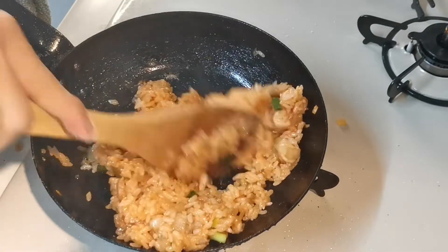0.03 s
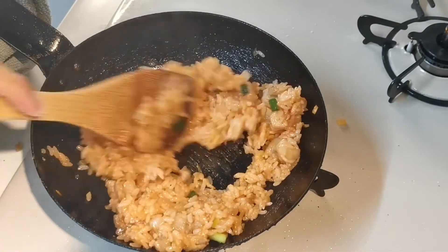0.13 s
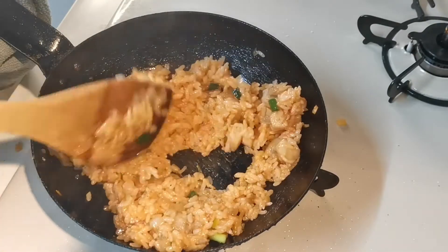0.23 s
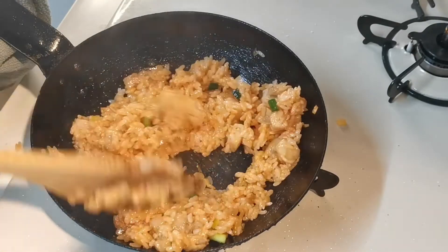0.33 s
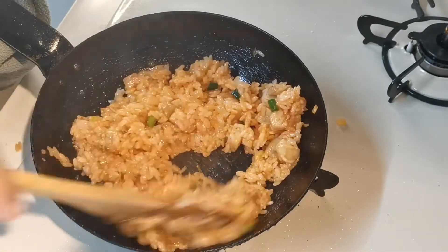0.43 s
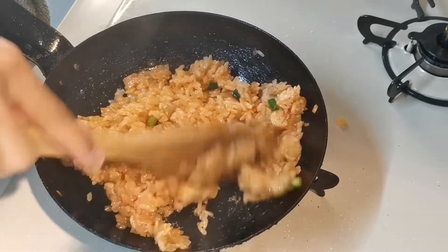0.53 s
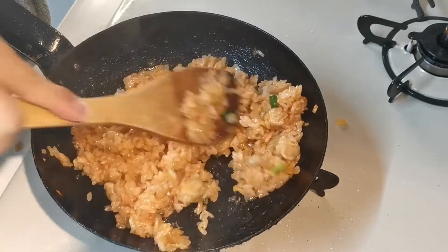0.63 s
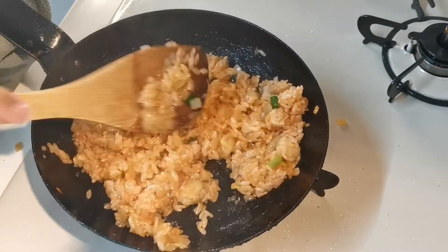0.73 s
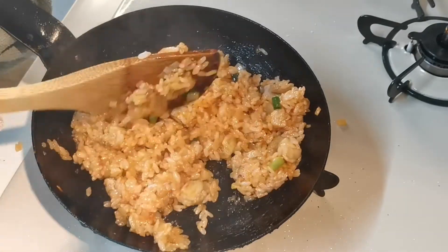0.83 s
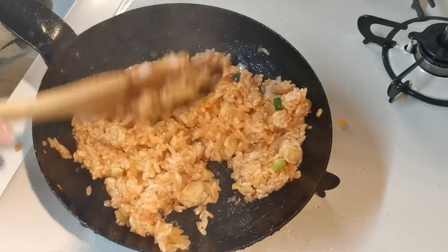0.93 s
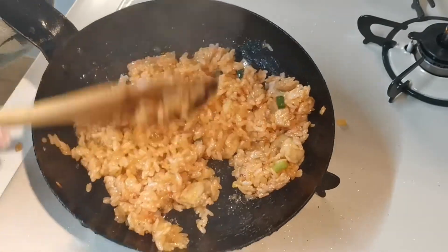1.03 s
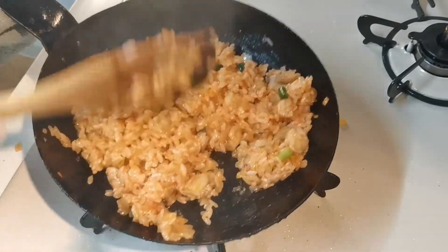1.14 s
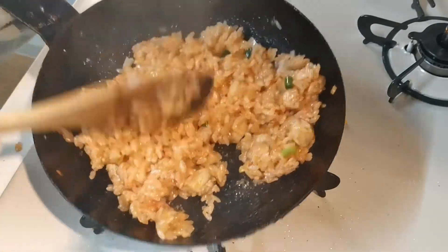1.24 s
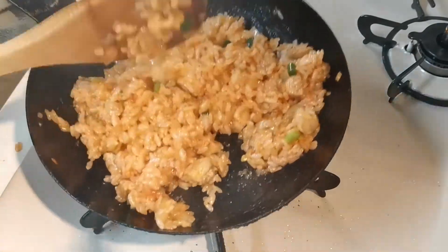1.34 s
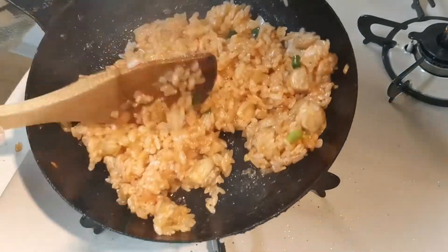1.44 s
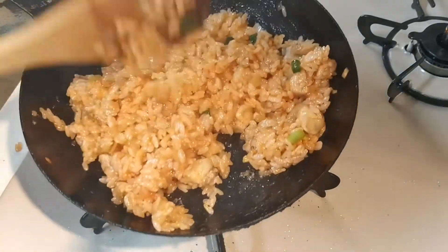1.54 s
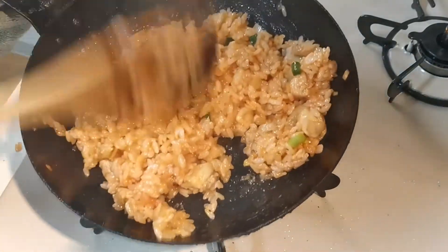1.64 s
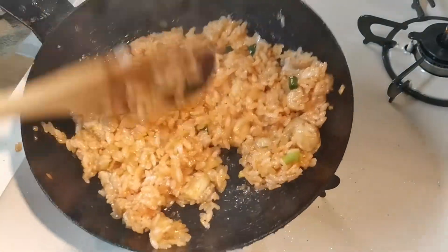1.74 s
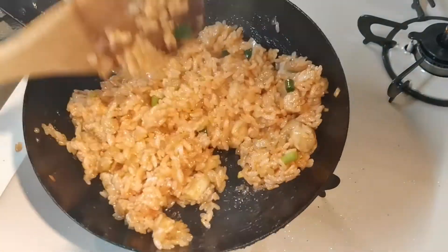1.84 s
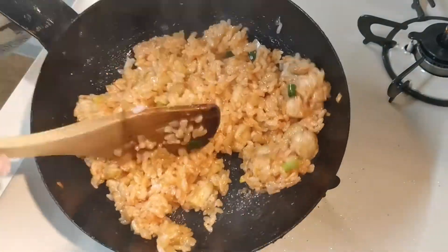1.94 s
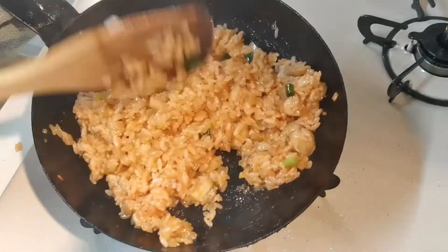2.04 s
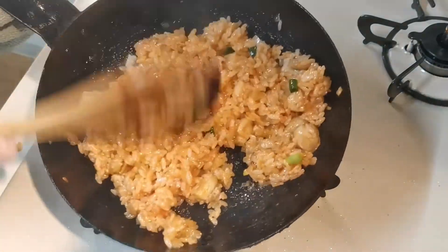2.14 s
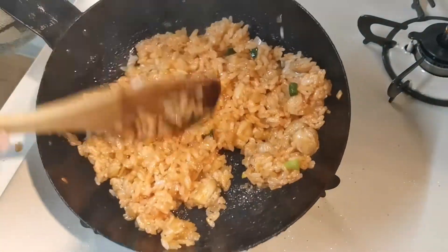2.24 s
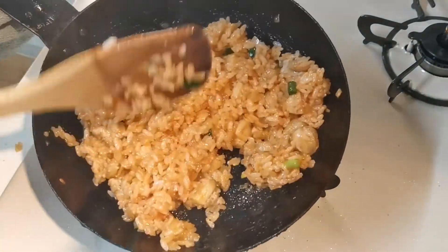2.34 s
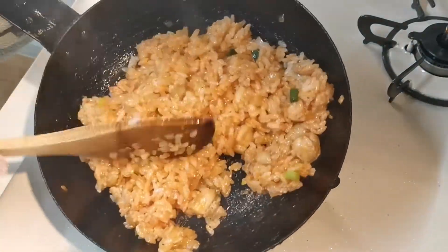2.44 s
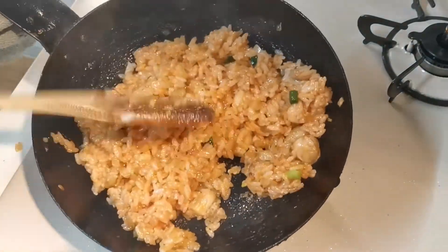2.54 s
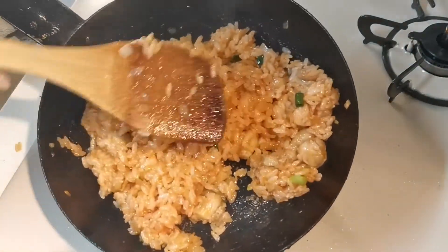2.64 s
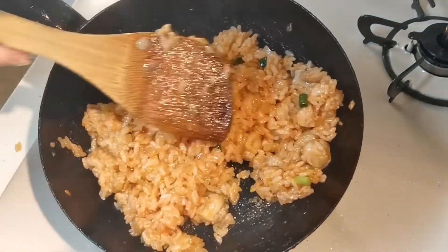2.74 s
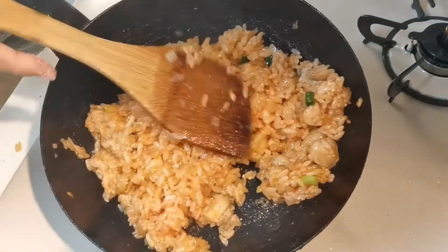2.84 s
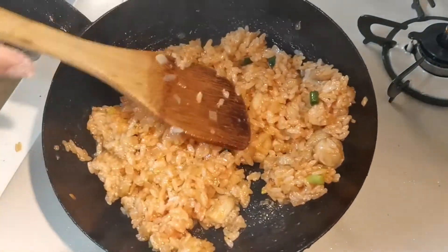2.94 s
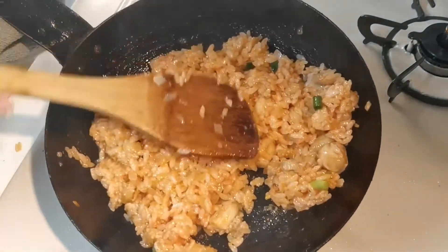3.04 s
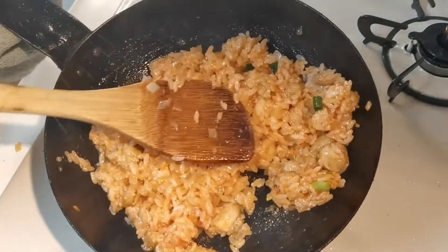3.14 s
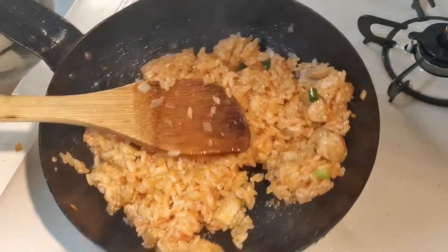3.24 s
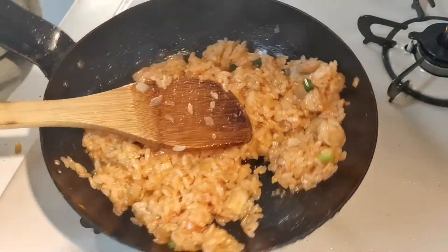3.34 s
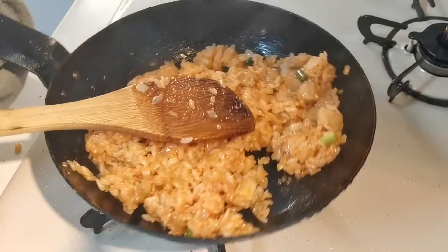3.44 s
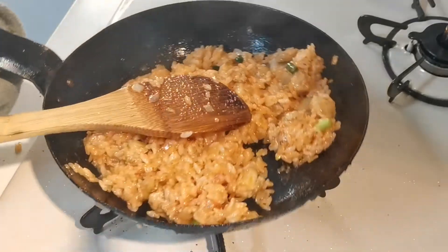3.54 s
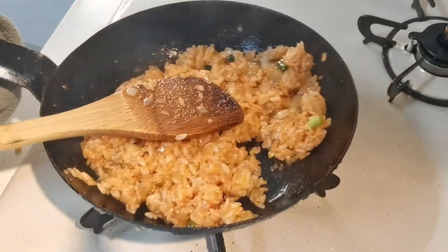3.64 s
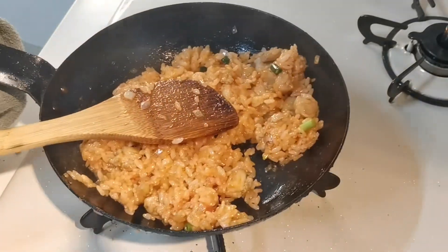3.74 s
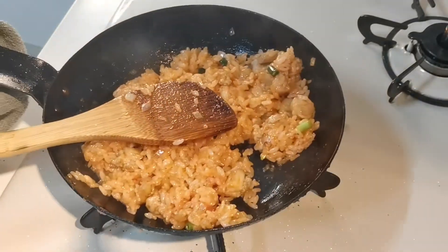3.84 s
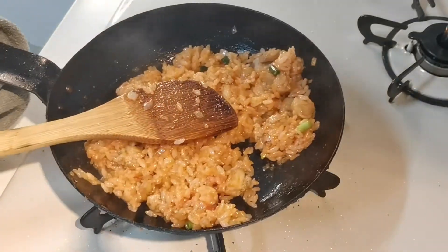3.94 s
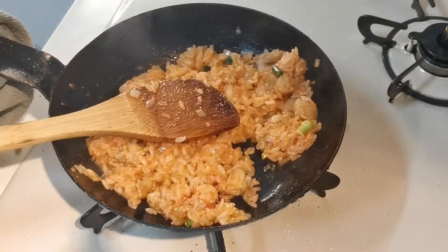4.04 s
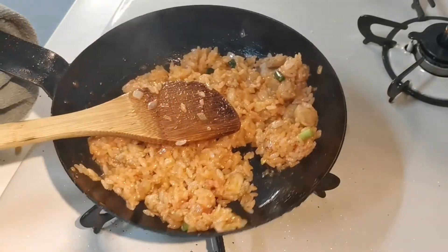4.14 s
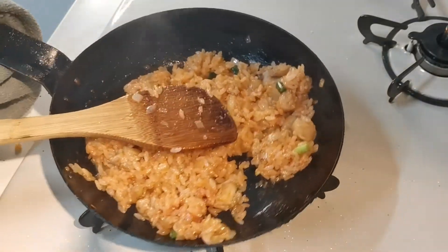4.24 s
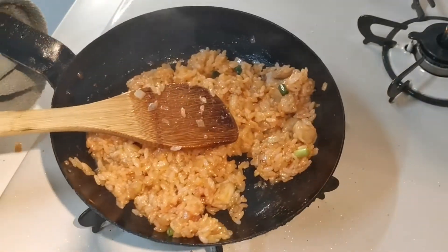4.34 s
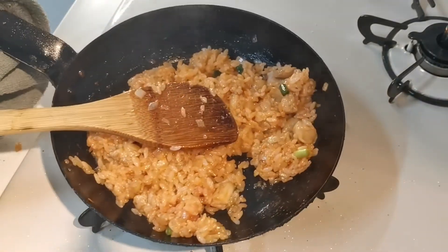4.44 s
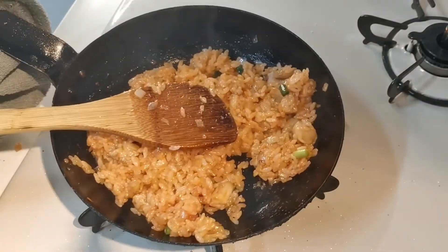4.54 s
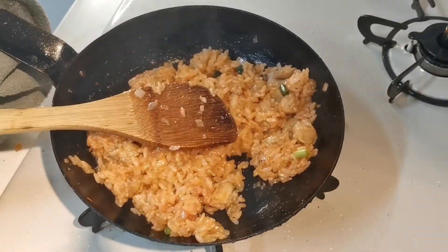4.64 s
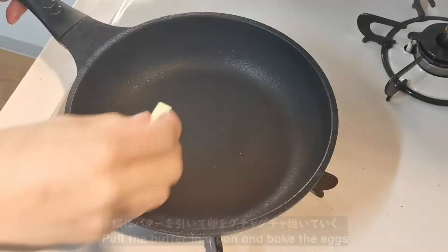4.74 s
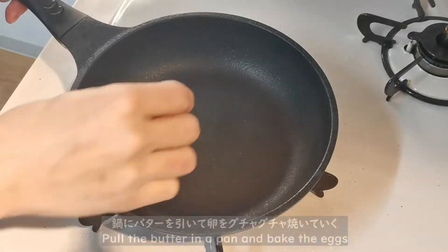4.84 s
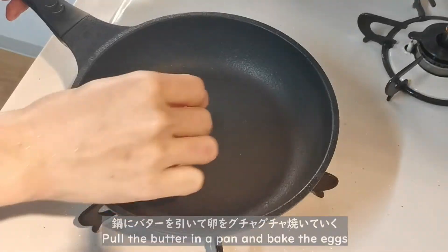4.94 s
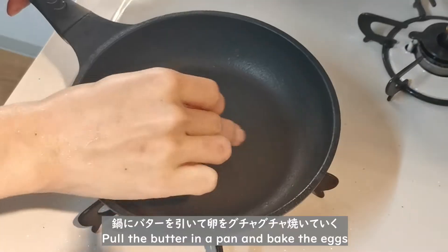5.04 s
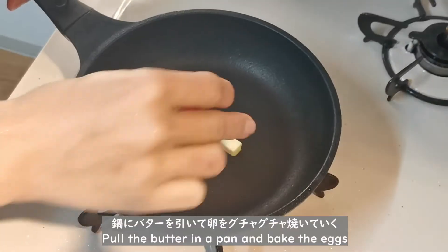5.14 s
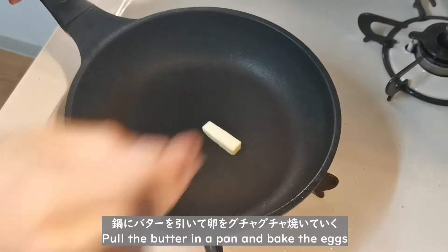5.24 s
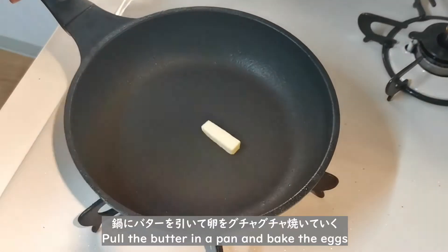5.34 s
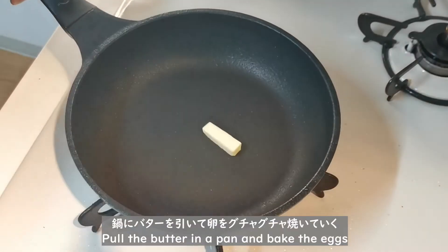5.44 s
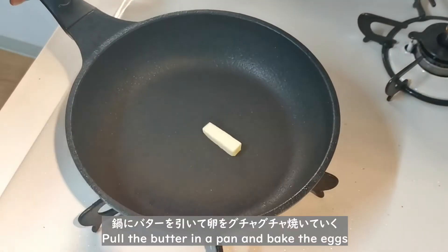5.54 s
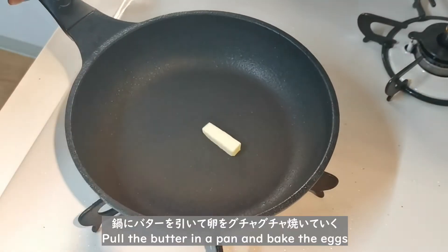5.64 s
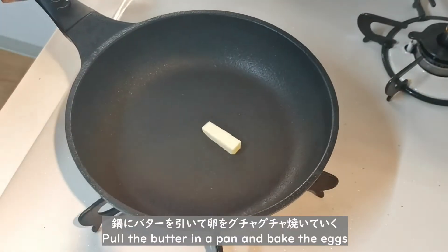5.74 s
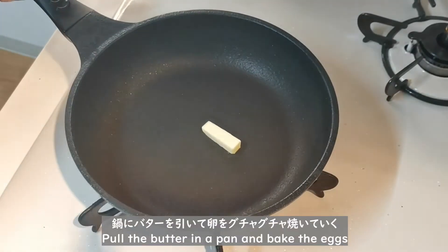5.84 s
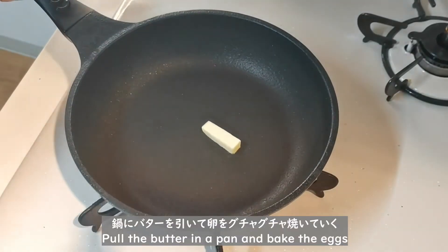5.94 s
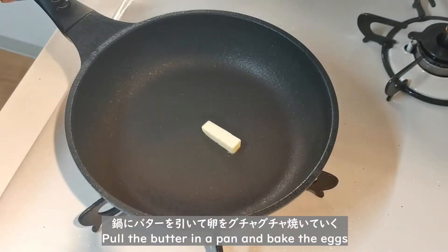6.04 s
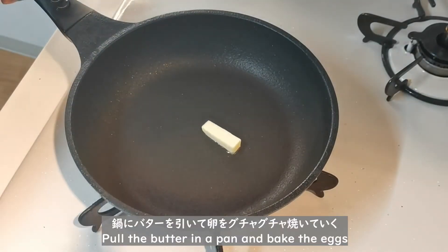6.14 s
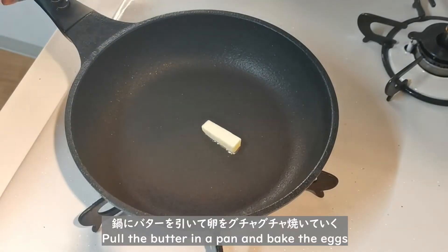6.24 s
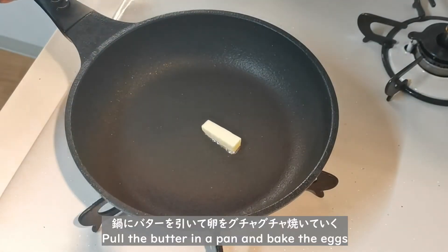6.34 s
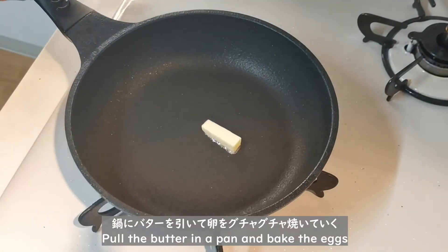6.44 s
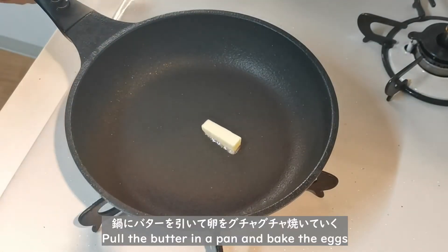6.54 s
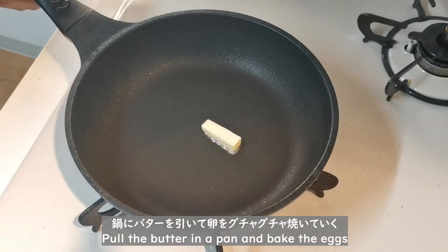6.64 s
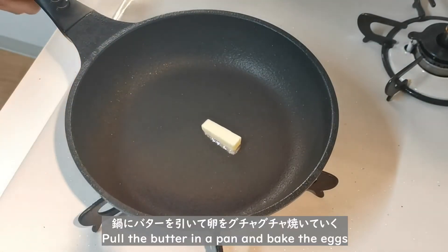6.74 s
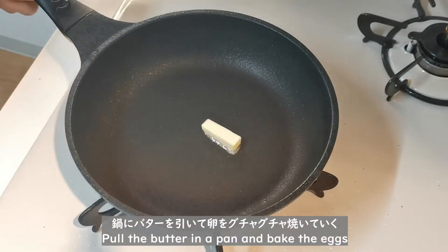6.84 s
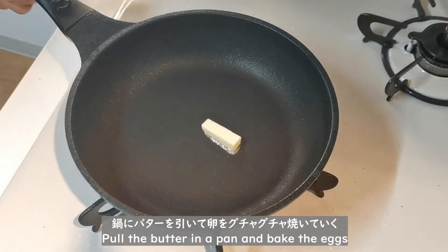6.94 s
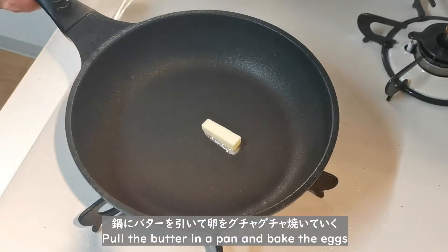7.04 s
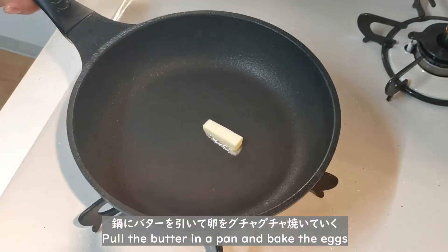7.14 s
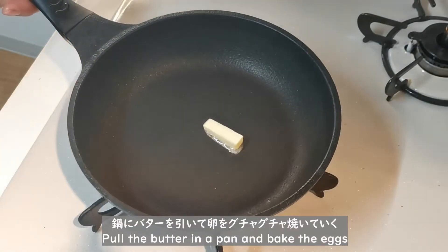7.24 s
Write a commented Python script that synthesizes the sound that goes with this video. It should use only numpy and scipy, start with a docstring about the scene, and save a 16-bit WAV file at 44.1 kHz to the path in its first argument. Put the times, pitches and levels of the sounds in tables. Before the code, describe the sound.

Soft kitchen air with faint hum and hiss runs throughout, heard closely in stereo in a small room. At 0.0 and 0.5 s rice hisses gently as a wooden spatula pushes it, with faint knocks. Around 0.98 s a short woody squeak leads to a strong clank at 1.03 s with a pan rumble. Six loud, dry raps on the rim follow at about 1.23, 1.47, 1.72, 1.98, 2.23 and 2.47 s, some with a thin metallic ring. Near-quiet follows, with tiny ticks. At 3.9 s the handle clacks down and bounces, squeaking at 4.0 s. From 4.2 to 4.6 s the pan clanks and scrapes on its iron stand. The air changes at 4.66 s. An empty pan gets two clearer taps near 5.1 s, a light squeaky touch at 5.5 s, then soft bumps, ticks and creaks until about 7.3 s.

```python
"""Over soft kitchen air, fried rice hisses as a wooden spatula pushes it about in a deep pan.
Six raps on the rim follow; the spatula is laid down and the pan is shifted on its iron trivet.
Then an empty pan is touched and creaks as it warms. A close pair of microphones hears it in a small room.
Blows excite ringing modes, sliding and air are coloured noise, squeaks are gliding tones."""
import sys
import numpy as np
from scipy import signal
from scipy.fft import rfft, irfft, next_fast_len
from scipy.io import wavfile
from scipy.ndimage import uniform_filter1d

SR = 44100
rng = np.random.default_rng(int(sys.argv[2]) if len(sys.argv) > 2 else 0)


def dump(signal):
    """Clip the signal to [-1, 1] and save it as 16-bit WAV at the path in sys.argv[1]."""
    limited = np.clip(np.atleast_2d(signal).T, -1, 1)
    pcm = np.round(limited * 32767).astype(np.int16)
    wavfile.write(sys.argv[1], SR, pcm)


N = 321930
TIME = np.arange(N) / SR
LENGTH = 2 ** 15  # samples in the workspace of one short sound
LEAD = 96  # samples kept free before a short sound, for its fade-in
NEAR_TIME = np.arange(LENGTH) / SR
NEAR_HZ = np.arange(LENGTH // 2 + 1) * SR / LENGTH
SPLICE_S = 4.659  # here the empty pan takes over from the full one


def undb(db):
    """Turns decibels into a plain gain."""
    return 10 ** (np.asarray(db) / 20)


def level(x, db):
    """Sets the average (rms) level of a sound."""
    return x * undb(db) / np.sqrt(np.mean(x ** 2))


def along(table, hz):
    """Reads a (Hz, value) table on a log-frequency axis, as pitch is heard."""
    f, value = np.transpose(table)
    return np.interp(np.log(hz + 1), np.log(f), value)


def diffuse(size, alike):
    """Spectra of a left and right noise, alike in the bass because long waves reach both ears together."""
    hz = np.arange(size // 2 + 1) * SR / size
    likeness = np.clip(along(alike, hz), 0, 1)
    mid, side = rfft(rng.standard_normal((2, size)))
    common, apart = np.sqrt(1 + likeness) * mid, np.sqrt(1 - likeness) * side
    return np.array([common + apart, common - apart]), hz


# how alike left and right are in steady noise: f/Hz, likeness 0-1
STEADY_LIKENESS = [(60, 0.9), (300, 0.4), (700, 0.3), (1400, 0)]


def noise(spectrum):
    """Steady stereo noise of a given colour, rms 1."""
    z, hz = diffuse(next_fast_len(N), STEADY_LIKENESS)
    return level(irfft(z * undb(along(spectrum, hz)))[:, :N], 0)


def grainy(spread_db, rate):
    """Uneven random gains, each held for 1 / rate s and smoothed, as from many small grains; rms about 1."""
    hold = int(SR / rate)
    steps = undb(spread_db * rng.exponential(size=N // hold + 1))
    return level(uniform_filter1d(np.repeat(steps, hold), hold)[:N], 0)


def response(modes, hz, lo, hi, dense_db):
    """Spectrum of a ringing body from lo to hi: clear modes over a crowd of damped ones on their outline."""
    z = np.exp(-2j * np.pi * hz / SR)
    fade_in = np.clip(3 * np.log2((hz + 1) / lo) + .5, 0, 1)
    fade_out = np.clip(3 * np.log2(hi / (hz + 1)) + .5, 0, 1)
    outline = along([m[:2] for m in modes], hz)
    out = fade_in * fade_out * undb(outline + dense_db) * np.ones((2, 1))
    draws = rng.standard_normal((len(modes), 4))
    for k, ((f, db, t60), (detune, loudness, *sides)) in enumerate(zip(modes, draws)):
        if lo <= f < hi:
            decay = np.log(1000) / (max(t60, .005) * SR)
            pole = np.exp(2j * np.pi * f * (1 + 0.0034 * detune) / SR - decay)
            ring = pole.imag * z / (1 - 2 * pole.real * z + abs(pole) ** 2 * z * z)
            apart = min(f / 1500, 1) * np.array([sides]).T  # short waves differ more across the pair
            # neighbouring modes have opposite sign
            out = out + (-1) ** k * undb(db + 1.2 * loudness + 2.9 * apart) * ring
    return out


# how alike left and right are in the pans' rumble and in the room: f/Hz, likeness 0-1
NEAR_LIKENESS = [(60, 0.96), (250, 0.95), (500, 0.98), (1200, 0)]
# how long the room rings (time to fall 60 dB): f/Hz, t60/s
ROOM_FADE = [(100, .55), (300, 0.36), (1000, 0.37), (3000, .33), (7000, 0.28), (13000, 0.2)]
ROOM_DB, ROOM_ONSET_S = -5.5, 0.0015


def room():
    """Spectrum of the walls' answer: noise that builds quickly and dies band by band; energy 1."""
    z, hz = diffuse(LENGTH, NEAR_LIKENESS)
    tail = 0
    for centre in 60 * 2. ** np.arange(9):
        band = np.clip(1 - abs(np.log2((hz + 1) / centre)), 0, 1)
        t60 = max(along(ROOM_FADE, centre), .05)
        tail = tail + irfft(z * band) * undb(-60 * NEAR_TIME / t60) / np.sqrt(t60)
    tail = tail * (1 - np.exp(-(NEAR_TIME / ROOM_ONSET_S) ** 2))
    return rfft(tail / np.sqrt(np.sum(tail ** 2) / 2))


LAG_S = .0001  # the right microphone hears the direct sound this much later


def add(out, s, spectrum, pan_db):
    """Places a near sound and its room tail at time s; long waves reach both microphones alike."""
    late = np.exp(-2j * np.pi * NEAR_HZ * LAG_S * np.array([[0], [1]]))
    pan = undb(np.minimum(NEAR_HZ / 700, 1) * np.array([[pan_db], [-pan_db]]) / 2)
    direct = spectrum * late * pan
    echo = undb(ROOM_DB) * spectrum * room() * np.sqrt(pan)
    half = LENGTH // 2
    sound = np.roll(irfft(direct + echo), LEAD, axis=1)[:, :half]
    sound = sound * signal.windows.tukey(half, 4 * LEAD / LENGTH)  # soft ends
    i = int(s * SR) - LEAD
    out[:, i:i + half] += sound[:, :N - i]


# gaps between rebounds: shares of the chatter time, before a random stretch
REBOUND_SHARES = (.05, .11, .2, .36)
WANDER_S = .0009  # the contact wanders: each ear has its own random delay scale, up to this


def chatter(length_s, first):
    """Rebounds of rebounds spread a blow in time and leave its colour even (a chain of allpasses)."""
    chance = rng.uniform(size=len(REBOUND_SHARES) + 2)
    gaps = [share * length_s * (.7 + .6 * c) for share, c in zip(REBOUND_SHARES, chance)]
    gaps.append(WANDER_S * chance[-2:, None])
    contacts = [first] * len(REBOUND_SHARES) + [-first]  # the last one leaves the bass alike in both ears
    out = 1
    for gap_s, g in zip(gaps, contacts):
        z = np.exp(-2j * np.pi * NEAR_HZ * np.round(gap_s * SR + 1) / SR)
        out = out * (z - g) / (1 - g * z)
    return out


def blows(events, touch, modes, dense_db, low_hz=400, high_hz=4000, favour_octaves=0.23):
    """A contact and a few ms of chatter ring a body; where it lands sets bass, treble and favoured modes."""
    out = np.zeros((2, N))
    first, favour_db, tilt_db = touch
    for s, mid_db, low_db, high_db, pan_db, spot_hz, chatter_s in events:
        push = chatter(max(chatter_s, .001), np.clip(first, .2, .9))
        distance = np.log2((NEAR_HZ + 1) / spot_hz) / favour_octaves
        tilt = tilt_db * np.log2(np.clip(NEAR_HZ, low_hz, high_hz) / low_hz)
        spot = undb(favour_db * np.exp(-distance ** 2) + tilt)
        bands = ((low_db, low_hz / 4, low_hz), (mid_db, low_hz, high_hz), (high_db, high_hz, SR))
        sound = 0
        for db, lo, hi in bands:
            part = push * spot * response(modes, NEAR_HZ, lo, hi, dense_db)
            peak = abs(irfft(part)).max(1).mean()
            sound = sound + part * undb(db) / peak
        add(out, s, sound, pan_db)
    return out


# colour of the kitchen air around the full pan: f/Hz, relative level/dB per Hz
FULL_PAN_AIR = [(12, -32), (20, 2), (70, -9), (132, -6), (288, -10), (313, -19), (360, -12.5), (531, -19.5),
                (701, -15.5), (828, -22.5), (900, -21), (1330, -24.5), (2890, -25), (13300, -39),
                (15300, -40.5)]
# the same around the empty pan: f/Hz, relative level/dB per Hz
EMPTY_PAN_AIR = [(12, -39), (20, -14), (53, -2.5), (97, -4.5), (224, -1), (502, -12.5), (644, -13.5),
                 (828, -14.5), (1400, -21), (2010, -20), (2190, -21.5), (4380, -26), (7640, -34),
                 (11300, -30.5), (15300, -44)]
# narrow appliance hums around the full pan: f/Hz, width/Hz, level/dB
HUM_BANDS = [(62, 5, -75.5), (713, 15, -75), ]
# a thin high whine all along: f/Hz, width/Hz, level/dB
WHINE_BAND = [(15640, 40, -89)]


def air(spectrum, db, lines):
    """Ventilation and microphone hiss: coloured noise that wavers a little, with steady narrow bands."""
    out = level(noise(spectrum), db) * grainy(1.3, 9)
    for hz, width, line_db in lines:
        near, far = width, 3 * width
        band = [(hz - far, -90), (hz - near, 0), (hz + near, 0), (hz + far, -90)]
        out = out + undb(line_db) * noise(band)
    return out


# two close notes of the iron trivet: f/Hz, level/dB, t60/s
TRIVET_MODES = [(4360, 0, .27), (4395, -5, .2)]
# blows that reach the trivet and set it ringing: t/s, level/dB
TRIVET_RINGS = [(1.227, -33.5), (1.473, -46), (1.72, -38), (1.982, -45), (5.80, -55)]


def trivet():
    """A close pair of iron modes beats as it fades."""
    out = np.zeros((2, N))
    starts = rng.uniform(0, 2 * np.pi, (len(TRIVET_RINGS), 2))
    for (s, db), phases in zip(TRIVET_RINGS, starts):
        ring = 0
        for (hz, mode_db, t60), phase in zip(TRIVET_MODES, phases):
            fade = undb(mode_db - 60 * NEAR_TIME / t60)
            ring = ring + fade * np.sin(2 * np.pi * hz * NEAR_TIME + phase)
        ring = ring * (1 - np.exp(-NEAR_TIME / 0.001))  # soft start
        add(out, s, undb(db) * rfft(np.array([ring, ring])), pan_db=2.0)
    return out


# notes of the full pan: f/Hz, relative level/dB, t60/s
FULL_PAN_MODES = [(74, -5, 0.13), (121.6, -4, 0.15), (215.4, -3, 0.06), (455, 3.5, 0.15), (560, -7.5, 0.36),
                  (805.3, 1, 0.1), (992, -0.5, 0.052), (1147, -3, 0.039), (1686, -5.5, 0.05),
                  (2070, -9.5, 0.087), (2559, -4, 0.046), (2940, -7, 0.09), (3760, -10.5, 0.029),
                  (4340, -12, 0.046), (5060, -21.5, 0.046), (6600, -27, 0.047), (7100, -25, 0.047),
                  (9700, -33, 0.033), (13300, -34.5, .03), (15100, -51, .02)]
# notes of the empty pan: f/Hz, relative level/dB, t60/s
EMPTY_PAN_MODES = [(123.5, 5.5, 0.22), (214, -3, 0.18), (394, 1.5, 0.025), (471, 0.5, 0.07),
                   (640, 1.5, 0.022), (800, 0, 0.06), (1070, 4.5, 0.042), (1330, -4, 0.15),
                   (1825, -4, 0.036), (1950, -4.5, 0.078), (2068, -9, 0.31), (2670, -16, 0.033),
                   (3232, -10, 0.17), (3920, -12, 0.13), (4550, -16, 0.067), (5000, -18, 0.2),
                   (5750, -20.5, 0.14), (6300, -15, 0.11), (7440, -18.5, .12), (8500, -25, 0.13),
                   (10800, -39, 0.044), (15500, -45, .02)]
# pans dragging and rocking on the trivet: t/s, hold/s, rumble level/dB, rasp level/dB, t60/s of the fade
PAN_SHOVES = [(0.069, .01, -48, -53.5, 0.46), (0.499, .003, -46, -79, 0.1), (0.536, 0.12, -60.5, -70, 0.22),
              (0.803, 0.3, -61.5, -62.5, .3), (1.05, .003, -41, -39, 0.24), (1.064, 0.14, -43, -57.5, 0.64),
              (3.973, .03, -49, -51.5, .8), (4.155, 0.028, -68, -50.5, .3),
              (4.196, 0.011, -39.5, -43, 0.57), (4.256, 0.034, -43, -35.5, 0.2),
              (4.357, .004, -29, -51, 0.15), (4.412, 0.2, -42, -67, 0.33),
              (5.727, 0.035, -49.5, -54.5, 0.27), (5.815, .01, -46.5, -55, 0.35),
              (6.128, .02, -46.5, -59, 0.1), (6.294, 0.028, -52, -69.5, 0.52),
              (6.767, 0.013, -54, -78.5, 0.29), (7.158, 0.016, -53, -53, 0.15), (7.23, .02, -49, -68, .3),
              (7.279, .03, -43.5, -57, .3)]
SHOVE_RISE_DB_S = 452


def dragging(start_s, end_s, modes, dense_db):
    """Rough contact shakes a pan's low modes into a rumble and its high ones into a rasp."""
    shoves = [shove for shove in PAN_SHOVES if start_s < shove[0] < end_s]
    shapes = []
    for s, hold_s, _, _, t60 in shoves:
        rise = SHOVE_RISE_DB_S * np.minimum(TIME - s, 0)
        fade = 60 * np.maximum(TIME - s - hold_s, 0) / t60
        shapes.append(undb(rise - fade))
    rumble, rasp = (2, 60, 400, -6, 3), (3, 520, SR, 2, 5)  # table column, Hz from, Hz to, crowd dB, grain dB
    out = 0
    for column, lo, hi, crowd_db, grain_db in (rumble, rasp):
        z, hz = diffuse(next_fast_len(N), NEAR_LIKENESS)
        shaken = irfft(z * response(modes, hz, lo, hi, dense_db + crowd_db))[:, :N]
        gain = undb(np.transpose(shoves)[column]) @ np.array(shapes)
        out = out + level(shaken, 0) * grainy(grain_db, 120) * uniform_filter1d(gain, size=221)
    return out


# colour of the sliding rice: f/Hz, relative level/dB per Hz
RICE_COLOUR = [(590, -36), (1000, -12), (1220, -20), (1610, -10.5), (2650, -6), (3270, -6), (4840, -3),
               (10900, -6.5), (16000, -23)]
# strokes of rice sliding over the coating: t/s, length/s, level/dB, swell/dB per s, release/s
RICE_STROKES = [(0.031, 0.14, -54, 18, 0.11), (0.482, 0.24, -60, 12, 0.035)]
STROKE_ATTACK_S = 0.016


def rice():
    """Oily grains hiss as they slide, a little more as the stroke gathers them."""
    gain = 0
    for s, length_s, db, swell_db, release_s in RICE_STROKES:
        t = TIME - s
        attack = np.minimum(t, 0) / STROKE_ATTACK_S
        release = (np.maximum(t - length_s, 0) / release_s) ** 2
        gain = gain + np.exp(attack - release) * undb(db + swell_db * np.clip(t, 0, length_s))
    return noise(RICE_COLOUR) * grainy(2.9, 700) * gain


# wood slipping on metal: t/s, f/Hz, level/dB, second partial level/dB, rise/s, fall/s,
# left minus right level/dB, glide/share per s, roughness 0-1
WOOD_SQUEAKS = [(.983, 1340, -32, -5.5, 0.0088, 0.004, 9.5, 0.61, 0.02),
                (4.008, 1240, -33, -9, 0.0061, 0.0075, -3, -0.66, 0.05),
                (0.892, 1740, -60, -30, 0.04, 0.02, 1, -.1, 0.04),
                (0.87, 2850, -64, -30, 0.044, 0.05, 1, -0.24, .04),
                (5.50, 2020, -42, -29, 0.014, 0.022, 3, -1.2, 0.05)]


def squeaks():
    """Stick-slip locks on one pitch and its double, wavering, swelling and letting go."""
    out = np.zeros((2, N))
    t = NEAR_TIME - .1  # the swell peaks at t = 0
    for s, hz, db, second_db, rise_s, fall_s, pan_db, glide, rough in WOOD_SQUEAKS:
        waver = level(uniform_filter1d(rng.standard_normal(LENGTH), 90), 0)
        pitch = hz * (1 + glide * np.clip(t, -.08, .08) + rough * waver)
        phase = 2 * np.pi * np.cumsum(pitch) / SR
        swell = np.where(t < 0, np.exp(-(t / rise_s) ** 2), np.exp(-abs(t) / fall_s))
        tone = swell * (np.sin(phase) + undb(second_db) * np.sin(2 * phase))
        add(out, s - .1, undb(db) * rfft(np.array([tone, tone])), pan_db)
    return out


# Blow tables: peak levels are those of the direct sound in each band, before left-right balance.
# small ticks: t/s, middle level/dB, bass level/dB, treble level/dB, left minus right level/dB,
# favoured f/Hz, chatter/s
RIM_TICKS = [(2.7294, -62, -71.5, -56, 4, 2700, 0.0096), (2.799, -61, -73, -57, 0.5, 3740, 0.0086),
             (2.9896, -61.5, -58.5, -59.5, 2, 2192, 0.0067), (6.146, -45, -52, -41, -8, 2737, 0.0092),
             (6.3378, -70.5, -64, -56.5, -3, 4670, .009), (6.558, -44.5, -75, -40.5, 1.5, 4820, 0.011),
             (6.653, -44.5, -73, -45.5, -8.5, 3450, 0.0054),
             (6.9102, -67.5, -65.5, -57, -1.5, 2320, 0.0097), (7.1132, -52, -50, -50, -5, 2150, 0.028)]
# how a tick lands: first contact 0-1, favour level/dB, tilt/dB per octave
TICK_LANDING = (0.743, 1.9, -1.61)
# notes of the rim: f/Hz, relative level/dB, t60/s
RIM_MODES = [(1060, -5, 0.041), (2560, -2, 0.12), (3520, 0, 0.081), (4570, 3, 0.067), (5900, -7, 0.029),
             (6700, -2.5, 0.05), (8600, -9, .03), (10900, -17, 0.049), (12900, -28, 0.022),
             (15500, -33, 0.019)]


def ticks():
    """Faint creaks and ticks ring the rim's high modes; the bass band ends higher here."""
    return blows(RIM_TICKS, TICK_LANDING, RIM_MODES, dense_db=38.5, low_hz=1910)


# touches on the empty pan: t/s, middle level/dB, bass level/dB, treble level/dB,
# left minus right level/dB, favoured f/Hz, chatter/s
PAN_TAPS = [(5.076, -24, -58, -46, 0, 893, 0.006), (5.1, -20, -67, -41.5, -5, 1300, 0.0062),
            (5.252, -40, -55, -69.5, -4.5, 845, 0.0048), (5.376, -49.5, -50.5, -59.5, -7, 905, 0.01),
            (5.495, -32.5, -64, -33.5, -8.5, 1880, 0.0075), (5.722, -46, -40.5, -74, -6, 462, 0.0087),
            (5.784, -38, -37.5, -56, -5, 486, 0.011), (5.84, -50.5, -44, -55, -10, 474, 0.0092),
            (6.106, -46, -47.5, -62.5, -7, 664, 0.0069), (6.716, -51, -50, -75, -6, 477, 0.0094),
            (7.15, -45, -47.5, -71.5, -6, 1050, 0.014), (7.255, -40.5, -59, -54, -1, 403, 0.0089)]
# how a tap lands: first contact 0-1, favour level/dB, tilt/dB per octave
TAP_LANDING = (0.764, 10.2, -0.4)


def taps():
    """Light touches ring the modes of the empty pan."""
    return blows(PAN_TAPS, TAP_LANDING, EMPTY_PAN_MODES, dense_db=41)


# knocks of the full pan: t/s, middle level/dB, bass level/dB, treble level/dB,
# left minus right level/dB, favoured f/Hz, chatter/s
PAN_CLANKS = [(0.04, -42, -46.5, -50, 3, 820, 0.014), (0.485, -48.5, -44.5, -50, 0, 475, 0.0089),
              (0.948, -44, -64, -86, 1, 980, 0.0087), (1.028, -10.5, -18, -19, 1.5, 658, 0.0096),
              (3.328, -40, -58, -56.5, 3.5, 1070, 0.0086), (4.205, -27, -26, -36, -7, 475, 0.013),
              (4.245, -22.5, -40, -30, -7, 510, 0.0087), (4.309, -28.5, -48, -31, -5, 845, 0.018),
              (4.337, -20, -30.5, -28, -4, 800, 0.012), (4.396, -31.5, -40, -43.5, -5, 900, .008),
              (4.349, -16.5, -23.5, -27.5, -8, 463, 0.0044), (4.534, -22, -34.5, -46.5, -0.5, 810, .004),
              (4.571, -14.5, -33.5, -24.5, -4, 767, 0.0035)]
# how a clank lands: first contact 0-1, favour level/dB, tilt/dB per octave
CLANK_LANDING = (0.698, 5.3, -1.5)


def clanks():
    """Knocks ring the modes of the full pan."""
    return blows(PAN_CLANKS, CLANK_LANDING, FULL_PAN_MODES, dense_db=49.0)


# the handle meets the rim and bounces: t/s, middle level/dB, bass level/dB, treble level/dB,
# left minus right level/dB, favoured f/Hz, chatter/s
HANDLE_BLOWS = [(3.9125, -14.5, -67, -26, 2.2, 2830, .002), (3.951, -29, -64, -50, 8, 1020, 0.002)]
# how the handle lands: first contact 0-1, favour level/dB, tilt/dB per octave
HANDLE_LANDING = (0.86, 2, 0.1)
# notes of the handle on the rim: f/Hz, relative level/dB, t60/s
HANDLE_MODES = [(200, -23, .03), (720, -3, 0.034), (1020, 1, 0.052), (1460, -5, .03), (2000, 2, .07),
                (2958, -0.5, .11), (3950, -6, .06), (4900, -9, 0.046), (5550, -10, .07), (7300, -18.5, .04),
                (9500, -28, .04), (12000, -36, .02), (15500, -52, .02)]


def laying_down():
    """The laid-down handle strikes the rim, then bounces once more softly."""
    return blows(HANDLE_BLOWS, HANDLE_LANDING, HANDLE_MODES, dense_db=41)


# six raps on the rim: t/s, middle level/dB, bass level/dB, treble level/dB,
# left minus right level/dB, favoured f/Hz, chatter/s
SPATULA_RAPS = [(1.227, -8, -27, -19, 1.5, 1700, 0.004), (1.472, -5.5, -27, -22.5, 1.5, 2770, 0.0027),
                (1.719, -8, -25.5, -19, 3.5, 2400, 0.0045), (1.981, -5.5, -26.5, -21.5, 3, 2810, 0.0032),
                (2.229, -8, -31.5, -20, 6.5, 2880, 0.0042), (2.473, -9.5, -32.5, -26.5, 4, 2720, 0.0053)]
# how a rap lands: first contact 0-1, favour level/dB, tilt/dB per octave
RAP_LANDING = (.72, 3.9, 1.5)
# notes of the rapped spatula: f/Hz, relative level/dB, t60/s
SPATULA_MODES = [(122, -11.5, 0.17), (224, -1.5, 0.13), (350, -3, .05), (463, 1, 0.04), (558, -4, 0.082),
                 (917, -5, 0.08), (1150, -1.5, 0.022), (1410, -3, 0.014), (1640, 0.5, 0.045),
                 (1908, 2, 0.04), (2090, -2, 0.022), (2490, -4.5, 0.015), (2820, -1, 0.006),
                 (3024, -6, 0.013), (3244, -15, .02), (3840, -14.5, .05), (4850, -15, .06),
                 (5650, -26.5, 0.013), (6470, -18.5, .08), (7000, -16.5, 0.06), (7630, -18.5, 0.065),
                 (8560, -24, .12), (9130, -25, 0.029), (11300, -34.5, .02), (13300, -45, 0.018),
                 (15500, -56.5, .02)]


def raps():
    """The wooden spatula strikes the rim and its short, woody modes ring."""
    return blows(SPATULA_RAPS, RAP_LANDING, SPATULA_MODES, dense_db=46)


def scene():
    """The full pan up to the splice, the empty pan after it; ticks, squeaks and trivet run across both."""
    after = np.clip((TIME - SPLICE_S) / 0.0021, 0, 1)
    full = air(FULL_PAN_AIR, -61, HUM_BANDS + WHINE_BAND)
    full = full + dragging(0, SPLICE_S, FULL_PAN_MODES, dense_db=38.5)
    full = full + rice() + clanks() + laying_down() + raps()
    empty = air(EMPTY_PAN_AIR, -58, WHINE_BAND)
    empty = empty + dragging(SPLICE_S, N / SR, EMPTY_PAN_MODES, dense_db=40.5) + taps()
    return full * (1 - after) + empty * after + trivet() + squeaks() + ticks()


# moments when the level dips briefly: t/s, length/s
LEVEL_DIPS = [(1.455, 0.0083), (1.709, 0.0035), (1.965, 0.0089), (2.22, 0.0031), (2.457, 0.012)]
BASS_CUT_HZ, TOP_HZ = 44, 15850


def record(dry):
    """Rolls off the deep bass, dips the level briefly between raps, then cuts the top."""
    thin = signal.lfilter(*signal.butter(2, BASS_CUT_HZ, "high", fs=SR), dry)
    gain = np.ones(N)
    for s, length_s in LEVEL_DIPS:
        inside = np.minimum(TIME - s, s + length_s - TIME)
        gain = gain * (1 - .95 * np.clip(inside / .001, 0, 1))
    top_cut = signal.ellip(10, .2, 80, TOP_HZ, fs=SR, output="sos")
    return signal.sosfilt(top_cut, thin * gain)


dry = scene()
out = record(dry)
dump(out)
```